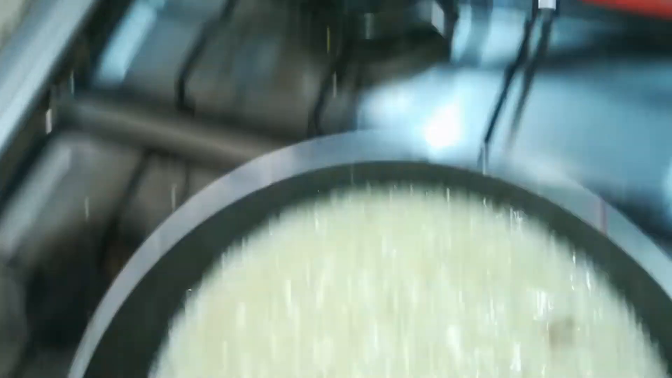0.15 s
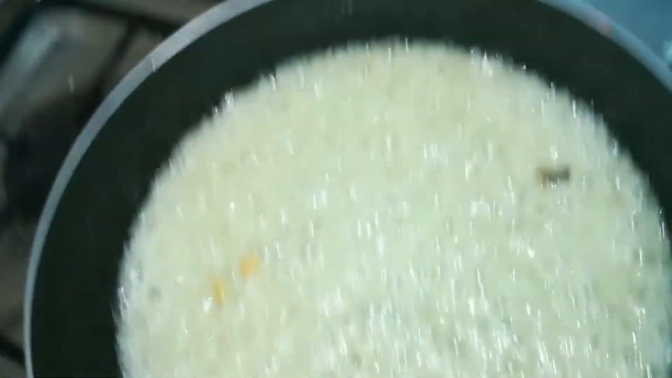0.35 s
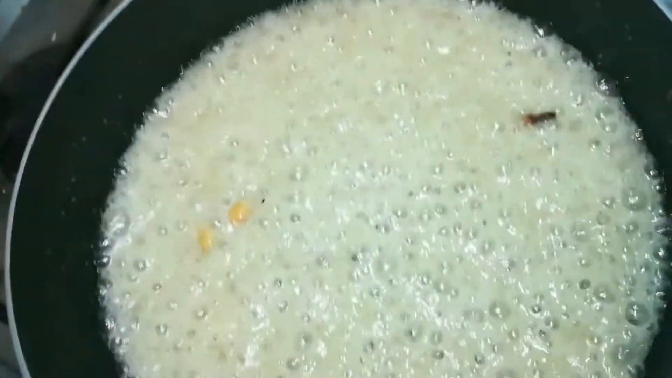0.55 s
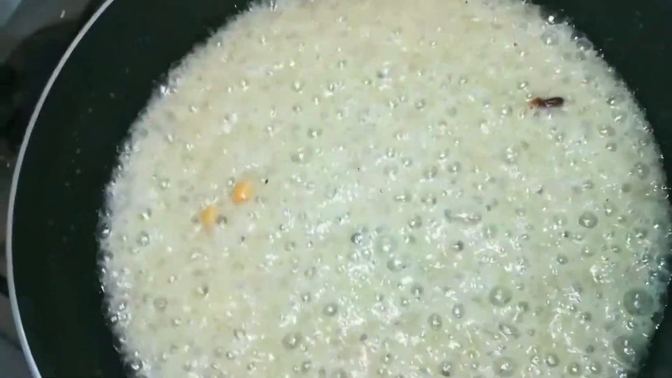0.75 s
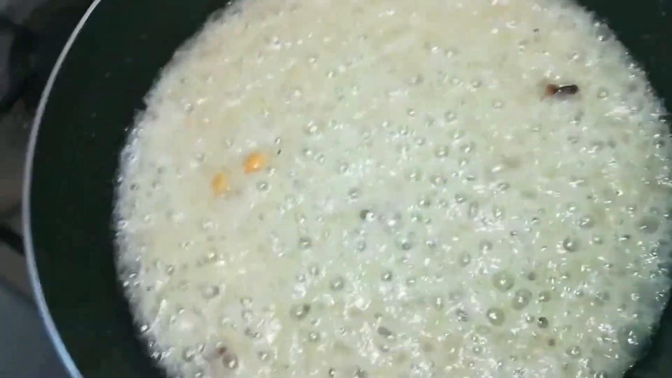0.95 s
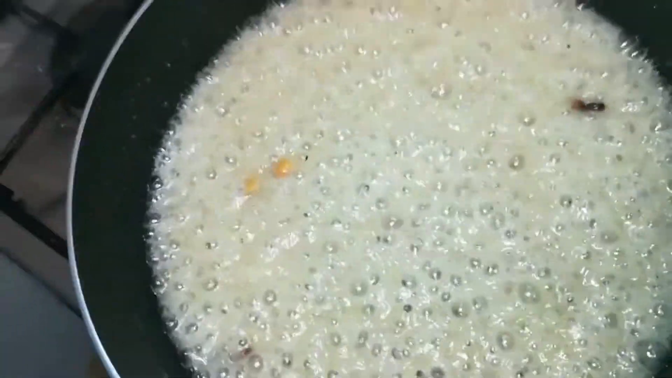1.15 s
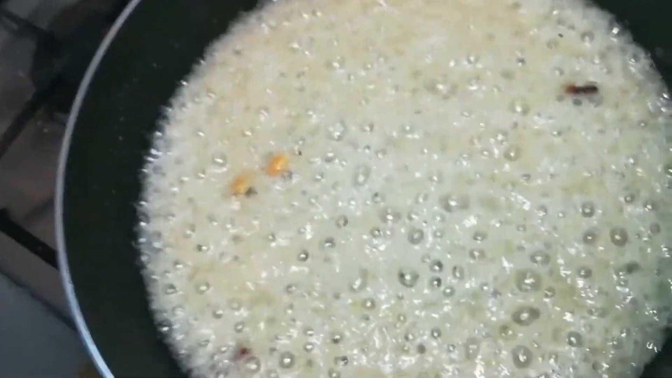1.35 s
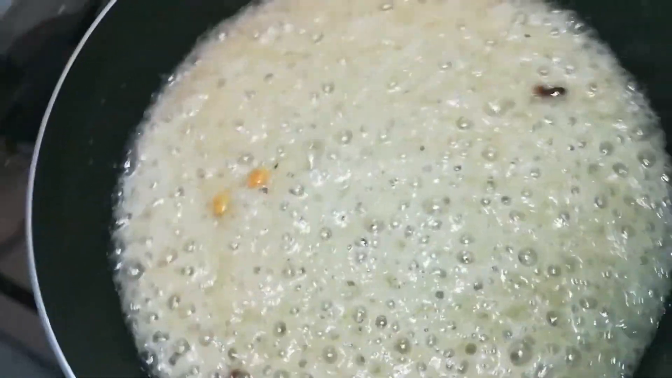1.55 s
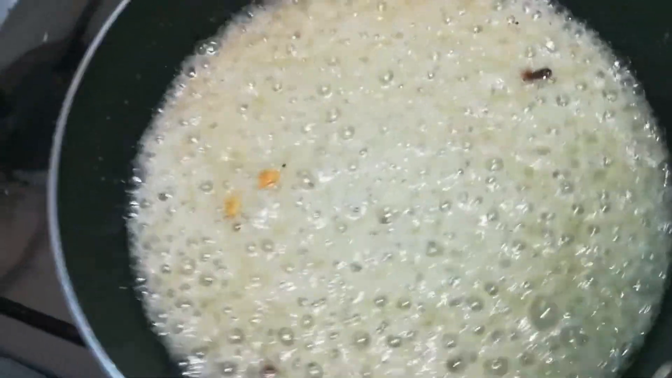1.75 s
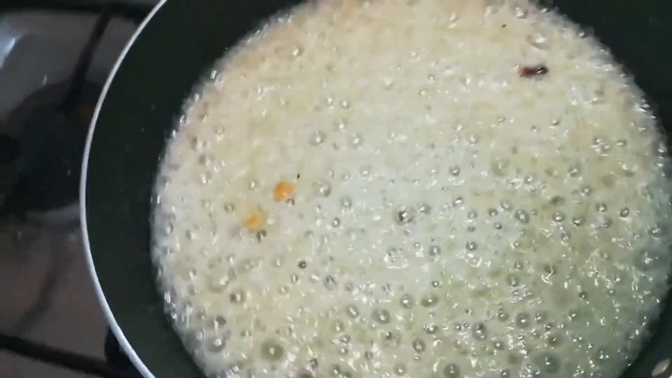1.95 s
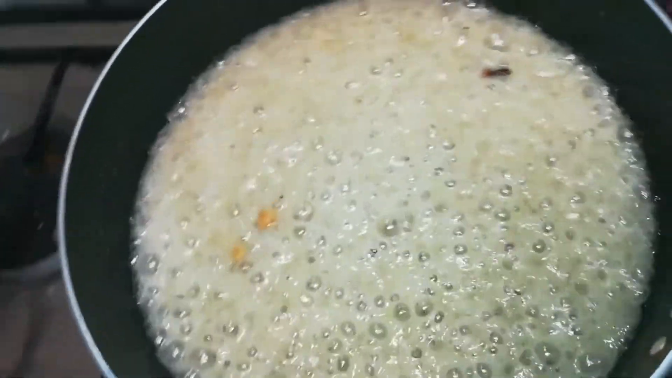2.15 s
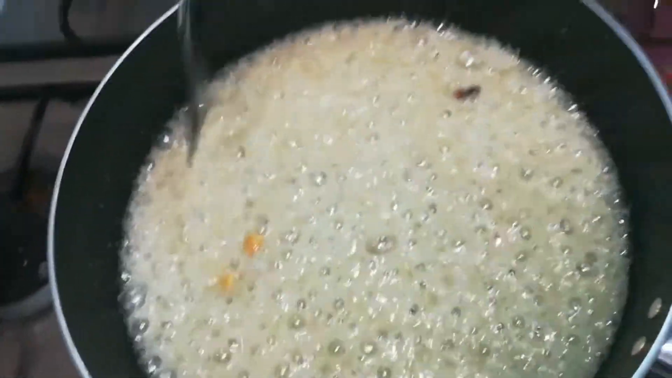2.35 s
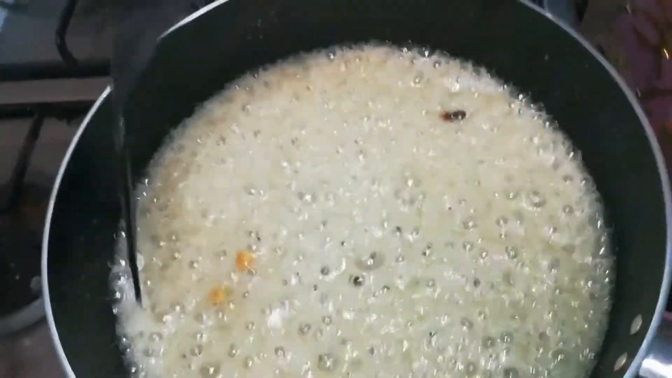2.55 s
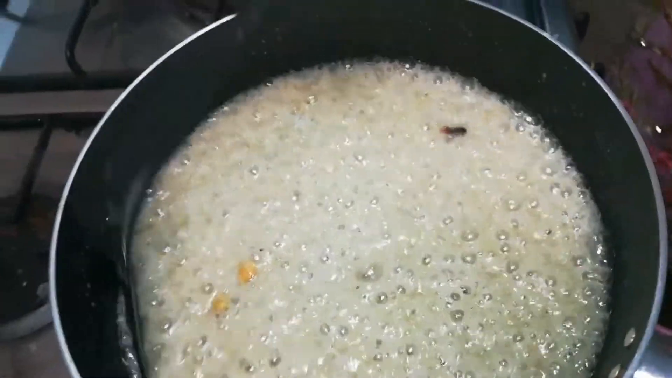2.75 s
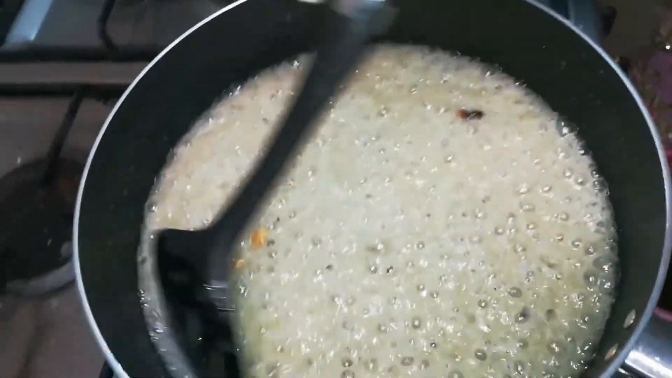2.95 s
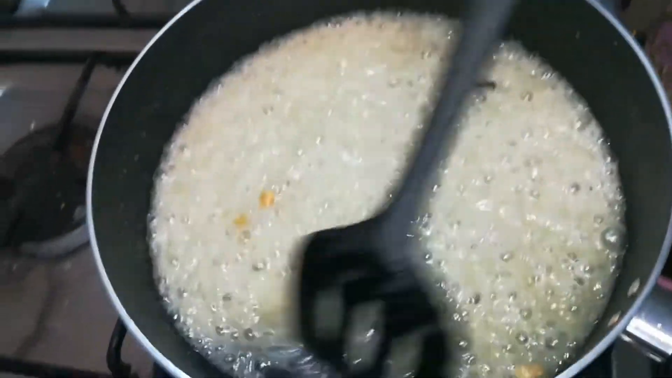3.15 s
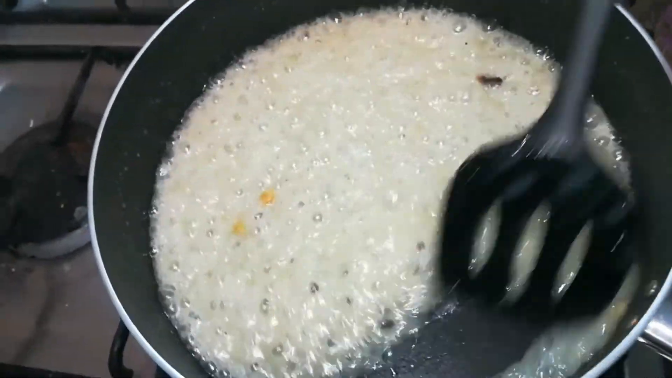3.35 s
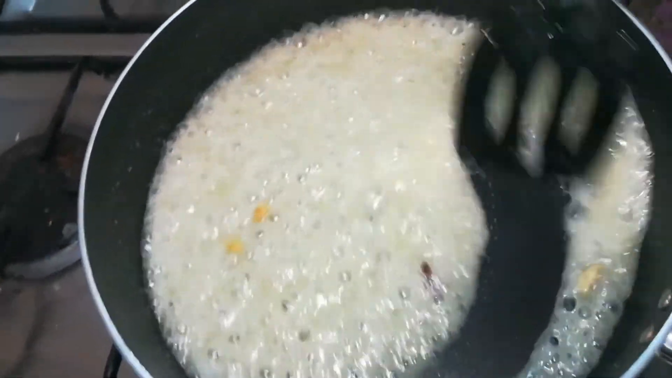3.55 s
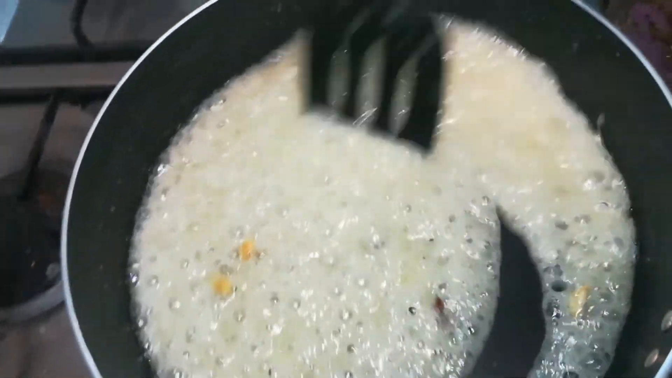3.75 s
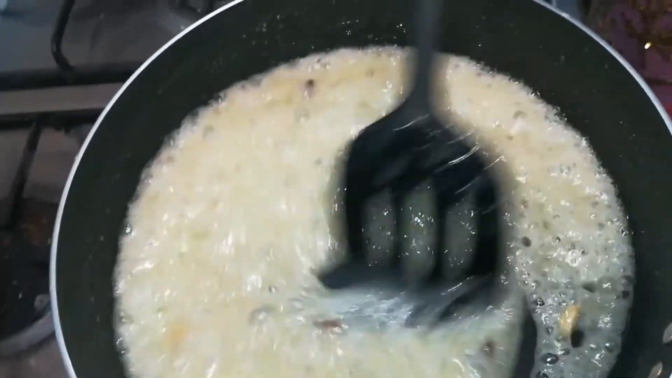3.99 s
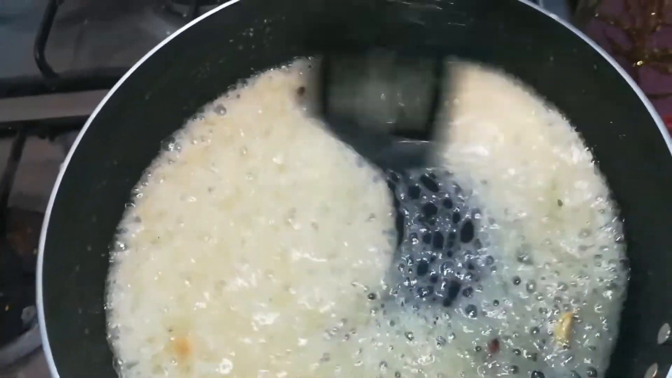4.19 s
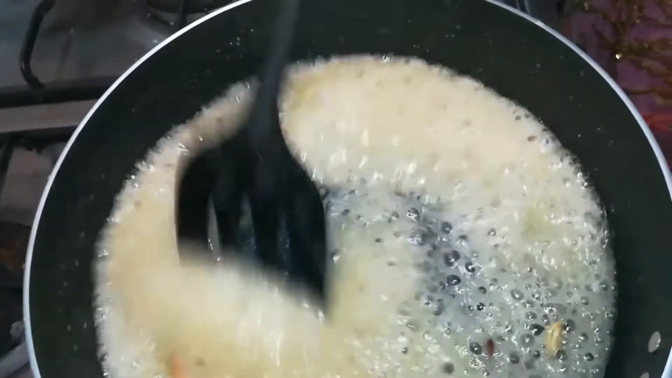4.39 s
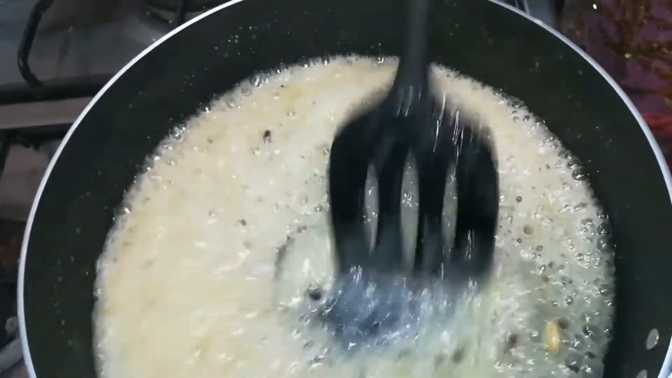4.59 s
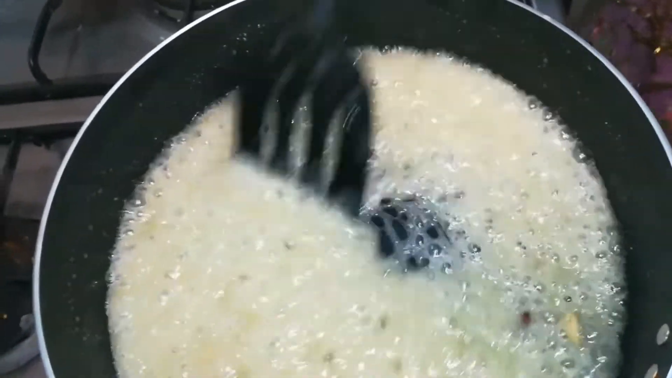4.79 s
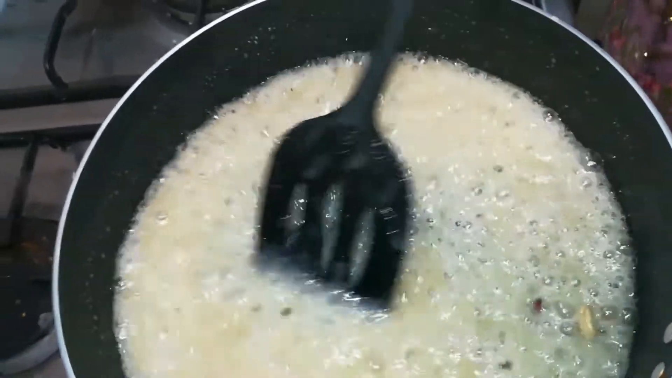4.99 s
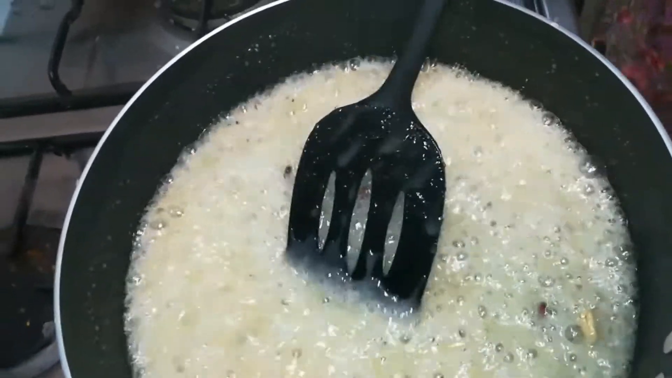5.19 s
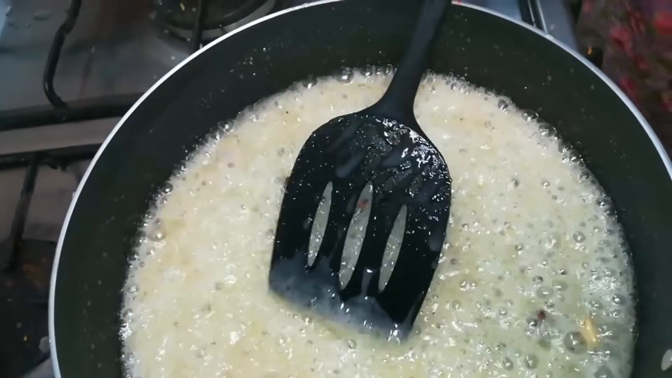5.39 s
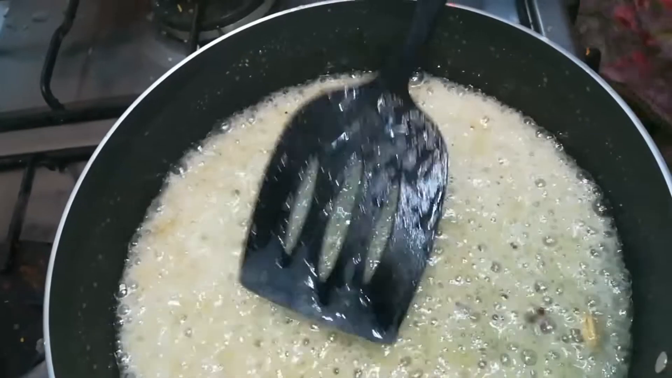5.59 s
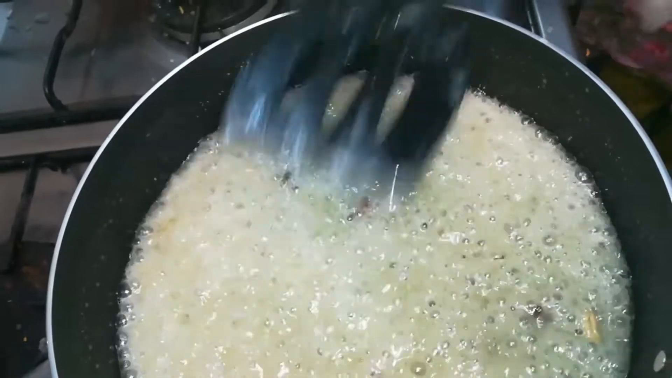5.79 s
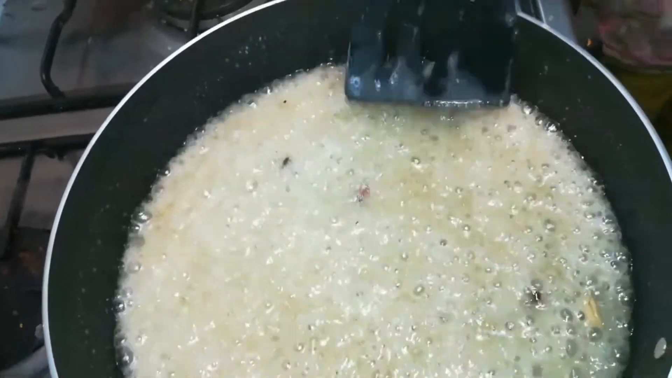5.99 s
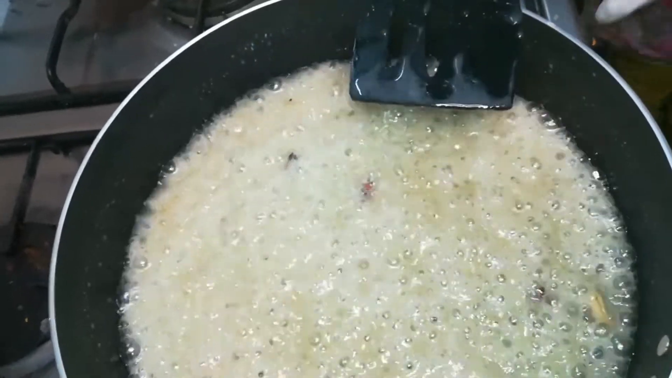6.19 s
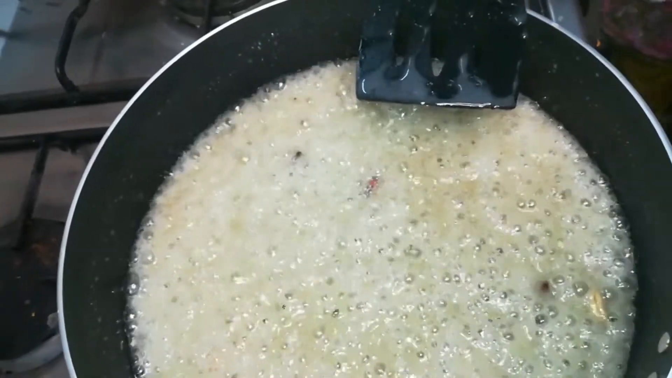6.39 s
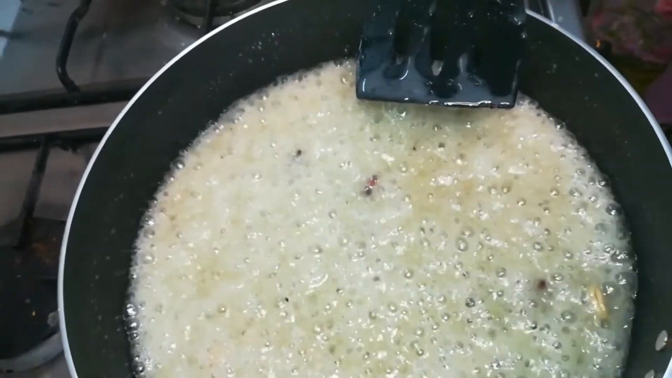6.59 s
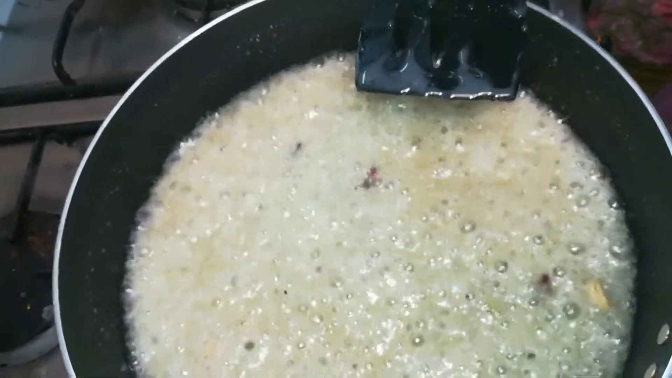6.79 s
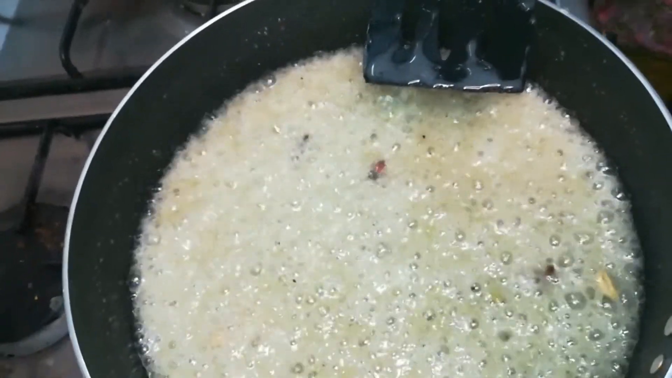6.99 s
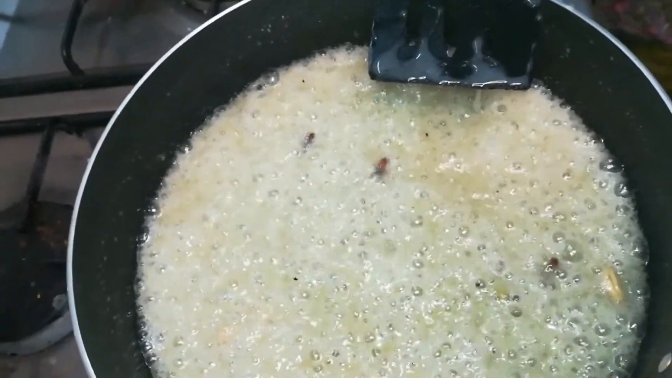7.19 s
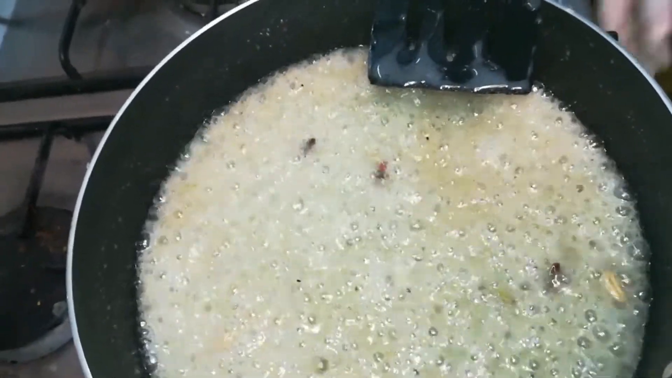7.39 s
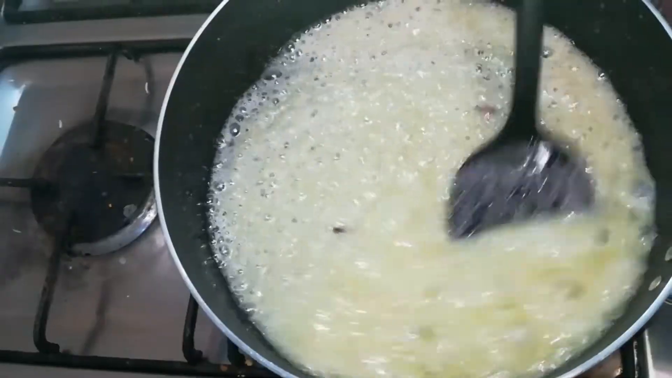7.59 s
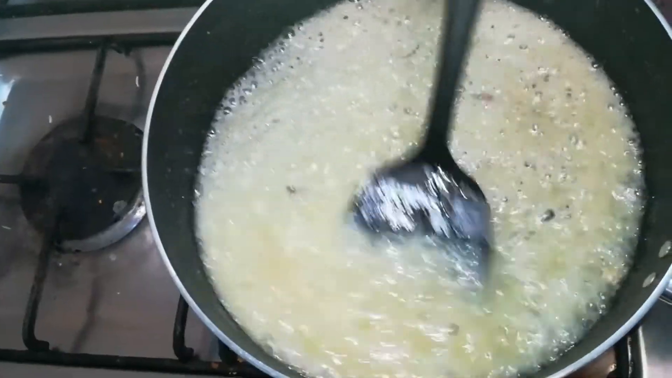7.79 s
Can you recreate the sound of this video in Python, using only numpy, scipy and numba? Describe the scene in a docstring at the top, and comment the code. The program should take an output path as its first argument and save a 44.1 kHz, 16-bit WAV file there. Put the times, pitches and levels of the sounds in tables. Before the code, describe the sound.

Close in a hard-walled kitchen, thick syrup boils in a pan on a gas stove: dense, bright ticking bubbles, fine fizz and a hollow burner rush. Faint bumps and hand rumble come from the handheld phone. Stirring brings a noisier sizzle and low gurgles. Then the spatula scrapes and strikes the pan with one very loud metallic crack and smaller follow-up knocks, before softer boiling ends abruptly.

```python
"""Thick sugar syrup boils in a pan on a gas stove, close to a hand-held phone in a hard-walled kitchen.
From the start, flurries of tiny ringing bubbles and a spitting rim sound over the burner's hollow resonant noise,
with hand rumble, spatula clacks and modal bumps; single bubbles snap out. Stirring bares hot metal: noisy sizzle
and low bubbles. Then a blade scrapes, hard blows ring pan and stove, and the boil calms; sound stops before the end."""
import sys
import numpy as np
from scipy import signal
from scipy.fft import rfft, irfft, next_fast_len
from scipy.io import wavfile
from scipy.ndimage import uniform_filter1d
from numba import njit

SR = 44100
rng = np.random.default_rng(int(sys.argv[2]) if len(sys.argv) > 2 else 0)


def wav_record(signal):
    """Record a signal, one row per channel, as 16-bit PCM in the file named by sys.argv[1]."""
    frames = np.transpose(np.atleast_2d(signal))
    bounded = np.clip(frames, -1, 1)
    # unit amplitude maps onto the largest positive 16-bit level
    quanta = np.round(bounded * 32767).astype(np.int16)
    wavfile.write(sys.argv[1], SR, quanta)


N = 345744
TIME = np.arange(N) / SR

# stove top and grate modes: pitch_hz, relative_db, t60_s
STOVE_MODES = [(66, -9.5, 0.54), (135.4, -7.5, 1), (144.3, 5, 0.3), (190.6, -4, 0.59), (218.4, -10, 0.63),
               (296, -1, .45), (320, -6.5, 0.42), (420, -12, 0.38)]
# spectrum of metal contact: frequency_hz, density_db
CONTACT_SPECTRUM = [(60, -23.5), (150, -5.5), (550, -8.5), (1400, -4.5), (2000, -8.5), (2600, -3),
                    (3600, -7), (6200, -2), (9000, -14), (15000, -23)]


def undb(db):
    """Decibels to gain."""
    return 10 ** (np.asarray(db) / 20)


def unit(x):
    """Scale to rms 1."""
    return x / np.sqrt(np.mean(x ** 2))


def curve(rows, axis=1):
    """One column of a table, joined by straight lines in time."""
    rows = np.asarray(rows, float)
    return np.interp(TIME, rows[:, 0], rows[:, axis])


def colour(x, points, power=1):
    """Filter by a (Hz, dB) spectrum; power scales its dB."""
    hz, db = np.transpose(points)
    size = next_fast_len(x.shape[-1])
    bins_hz = np.fft.rfftfreq(size, 1 / SR)
    gain = undb(power * np.interp(np.log(bins_hz + 1), np.log(hz), db))
    return irfft(rfft(x, size) * gain, size)[..., :x.shape[-1]]


def diffuse(size, alike_hz=430):
    """Noise from all around: long waves reach both ports alike, short ones do not."""
    mid, side = rfft(rng.standard_normal((2, size)))
    apart = 1 - 1 / (1 + (np.fft.rfftfreq(size, 1 / SR) / alike_hz) ** 4)
    mid, side = mid * np.sqrt(2 - apart), side * np.sqrt(apart)
    return unit(irfft(np.array([mid + side, mid - side]), size))


def walk(rate_hz):
    """Random levels, each held 1 / rate_hz s and slewed, at rms 1."""
    hold = max(int(SR / rate_hz), 2)
    steps = np.repeat(rng.standard_normal(N // hold + 1), hold)
    return unit(uniform_filter1d(steps, hold)[:N])


def fade(t, t60_s):
    """Free decay by 60 dB in t60_s."""
    return np.exp(-np.log(1000) * t / t60_s)


def add(out, start_s, sound):
    """Mix a sound in at start_s."""
    start = max(int(start_s * SR), 0)
    out[:, start:start + sound.shape[-1]] += sound[..., :N - start]


@njit
def resonate(x, hz, width_hz):
    """State-variable band-pass with a moving centre."""
    y, band, low = np.empty(len(x)), 0., 0.
    for i in range(len(x)):
        g, damping = np.tan(np.pi * hz[i] / SR), width_hz / hz[i]
        v = (band + g * (x[i] - low)) / (1 + g * (g + damping))
        band, low, y[i] = 2 * v - band, low + 2 * g * v, damping * v
    return y


@njit
def bubbles(times_s, hz, cycles, size):
    """Each bubble swells within a cycle and rings out over a few more."""
    y = np.zeros(N)
    for k in range(len(times_s)):
        first = int(times_s[k] * SR) + 1
        last = min(first + int(cycles[k] / hz[k] * SR), N)
        for i in range(max(first, 0), last):
            turn = (i / SR - times_s[k]) * hz[k]
            swell = 1 - np.exp(-2 * turn)
            decay = np.exp(-5 * turn / cycles[k])
            y[i] += size[k] * np.sin(2 * np.pi * turn) * decay * swell
    return y


def swarm(count, hz, octaves, cycles, spread_db, lag_s=0.000398, pan_db=3):
    """Bubbles all over the pan, each with its own size, pitch and path to the two ports."""
    when, rank, place = rng.random((count, 3)).T
    pitch, ringing, side = rng.standard_normal((count, 3)).T
    # the offset caps the size: bubbles burst before they grow very large
    size = undb(-spread_db * np.log(rank + .03))
    # bubbles close in time share a patch of foam and are alike in pitch
    patch = walk(22)[(when * N).astype(int)]
    pitch_hz = np.clip(hz * 2 ** (octaves * (pitch + .45 * patch)), 100, SR / 3)
    ring_cycles = cycles * np.exp(0.26 * ringing)
    ports = []
    for ear in (1, -1):
        times_s = when * N / SR + ear * lag_s * (place - .5)
        ports.append(bubbles(times_s, pitch_hz, ring_cycles, size * undb(ear * pan_db * side / 2)))
    return unit(np.array(ports))


def echoes(x, t60_s, wet_db):
    """Short reflections from the pan wall and the stove."""
    t = TIME[:SR // 4]
    tail = diffuse(len(t)) * fade(t, t60_s)
    tail /= np.sqrt(np.sum(tail ** 2) / 2)
    return unit(x + undb(wet_db) * signal.fftconvolve(x, tail, axes=1)[:, :N])


def ring(modes, t):
    """Decaying modes; the higher ones reach the two ports out of step."""
    out = 0
    for hz, db, t60_s in modes:
        skew_rad = np.array([[1], [-1]]) * rng.choice([-1, 1]) * min(hz / 800, np.pi / 4)
        out = out + undb(db) * fade(t, t60_s) * np.sin(2 * np.pi * hz * t + skew_rad)
    return out / np.sqrt(np.mean(out[:, :SR // 20] ** 2))


def boil_gain():
    """How hard the syrup boils: steady with a few flurries and lulls, then calmer as it cools."""
    # flurries and lulls of the foam: middle_s, change_db
    flurry_rows = [(.87, 2), (1.87, 4), (2.35, 3), (2.67, 1.5), (2.77, -4.5), (5.58, -1.5), (6.87, -2)]
    half_length_s = 0.089
    level_db = np.interp(TIME, [5.1, 7.4], [-49, -52])  # s, dB
    for middle_s, change_db in flurry_rows:
        level_db = level_db + change_db * np.exp(-((TIME - middle_s) / half_length_s) ** 2)
    return undb(level_db)


def boil():
    """Bursting foam: a dense patter of sharp ticks over a fine fizz of countless smaller ones."""
    # fizz spectrum: frequency_hz, density_db
    foam_spectrum = [(500, -35.5), (1000, -10), (2300, -8.5), (4000, 2.5), (5800, 3.5), (7200, -11.5),
                     (9000, -12.5), (12000, -14), (15500, -20)]
    surge_db, surges_per_s = .5, 11
    ticks = swarm(count=13000, hz=6200, octaves=.27, cycles=9, spread_db=4.6)
    ticks = colour(ticks, [(1500, -10), (4000, -2.5), (7000, -0.5), (10000, -5.5), (15000, -3.5)])
    flicker = undb(.8 * walk(35))
    ticks = echoes(ticks * flicker, t60_s=.06, wet_db=-9.5)
    fizz = swarm(count=40000, hz=5180, octaves=0.71, cycles=1.3, spread_db=3.0)
    fizz = unit(colour(fizz, foam_spectrum)) * flicker
    foam = undb(3.5) * ticks + undb(-1.0) * fizz
    return foam * boil_gain() * undb(surge_db * walk(surges_per_s))


def sizzle_gain():
    """Sizzling swells as the spatula bares the metal and dies as syrup flows back; the rim always spits."""
    # stirring spells that bare hot metal: start_s, end_s, sizzle_db
    stir_rows = [(3.1, 3.2, -49), (3.702, 4.622, -41.5), (7.448, 7.497, -55.5)]
    rise_db_per_s, fall_db_per_s = 26, 11
    rim_db = -7.5  # relative to the boil
    power = (boil_gain() * undb(rim_db)) ** 2
    for start_s, end_s, db in stir_rows:
        rise_db = rise_db_per_s * np.maximum(start_s - TIME, 0)
        fall_db = fall_db_per_s * np.maximum(TIME - end_s, 0)
        power = power + undb(db - rise_db - fall_db) ** 2
    return np.sqrt(power)


def stirring():
    """Hot metal at the rim and under the spatula spits; strokes fold larger, lower bubbles into the syrup."""
    # spitting spectrum: frequency_hz, density_db
    spit_spectrum = [(150, -17.5), (350, -12), (700, -21.5), (1500, -6.5), (2600, -3), (4000, -1.5),
                     (6500, 7.5), (9000, 3), (12000, 0), (15500, -2)]
    # strokes through the syrup: middle_s, length_s, level_db, bubble_pitch_hz
    stroke_rows = [(2.335, 0.098, -45.5, 1820), (3.545, 0.14, -53, 770), (3.927, 0.13, -46.5, 770),
                   (4.156, 0.12, -45, 740), (4.198, 0.034, -41.5, 830), (4.31, 0.4, -49, 1100),
                   (4.434, 0.057, -45.5, 734), (4.547, 0.084, -51, 910), (4.758, 0.19, -44.5, 857),
                   (4.936, 0.18, -53, 910)]
    spit = swarm(count=45000, hz=4150, octaves=1.443, cycles=1.55, spread_db=1.0)
    out = unit(colour(spit, spit_spectrum)) * sizzle_gain()
    for middle_s, length_s, db, hz in stroke_rows:
        slosh = swarm(count=6000, hz=hz, octaves=0.51, cycles=6, spread_db=-2.5)
        # the thick syrup smothers the largest bubbles
        slosh = unit(colour(slosh, [(hz / 2, -10), (hz, 0)]))
        out += slosh * undb(db) * np.exp(-2 * ((TIME - middle_s) / length_s) ** 2)
    return out


def burner():
    """The gas flame rushes under the pan and sounds a hollow, wandering resonance above a low drone."""
    # hollow resonance: time_s, pitch_hz, level_db
    burner_rows = [(0, 1220, -55), (.4, 1300, -58), (.65, 1298, -52.5), (1.1, 1270, -49.5),
                   (1.7, 1268, -53), (2.15, 1394, -53), (2.5, 1340, -53.5), (2.9, 1390, -55.5),
                   (3.4, 1250, -50), (3.65, 1256, -53.5), (5.2, 1316, -54.5), (5.5, 1290, -52.5),
                   (5.7, 1346, -57), (6.65, 1353, -53.5), (6.97, 1330, -56.5), (7.25, 1320, -52.5)]
    # rush spectrum: frequency_hz, density_db
    flame_spectrum = [(200, -25), (400, -17.5), (580, -11.5), (790, 2.5), (950, -2), (1300, 5.5),
                      (1700, -8.5), (2500, -19), (5000, -12.5), (15000, -33.5)]
    hz = curve(burner_rows) * (1 + .008 * walk(17.0))
    level_db = curve(burner_rows, axis=2)
    # two band-passes in series
    hollow = [resonate(resonate(x, hz, 120.0), hz, 580.0) for x in diffuse(N)]
    hollow = unit(np.array(hollow)) * undb(level_db + 2.5)
    # the rush follows the level half as far
    rush = unit(colour(diffuse(N), flame_spectrum)) * undb(-3 + (level_db + level_db.mean()) / 2)
    drone_spectrum = [(60, -23.0), (105, -3.5), (138, 5.0), (175, -15.5), (280, -14), (400, -28),
                      (900, -37.0)]
    drone = unit(colour(diffuse(N), drone_spectrum)) * undb(-65.5 + 1.5 * walk(1.7))
    return hollow + rush + drone


def handling():
    """The hand rumbles faintly through the phone, most while it swings towards the pan."""
    # rumble spectrum: frequency_hz, density_db
    rumble_spectrum = [(20, -0.5), (40, -1), (65, -0.5), (95, -10.5), (180, -16.5), (400, -31.5),
                       (900, -48.5)]
    swing_db, swing_end_s, swing_t60_s, held_db = -52.5, 0.31, 0.61, -59.5
    swing = undb(swing_db) * fade(np.maximum(TIME - swing_end_s, 0), swing_t60_s)
    rumble = unit(colour(diffuse(N), rumble_spectrum))
    return rumble * (swing + undb(held_db)) * undb(1.5 * walk(8.7))


def clacks():
    """The light spatula sounds one broad resonance: noise with a decay and a fainter, slower tail."""
    # clacks of the spatula: start_s, level_db, pitch_hz, t60_s
    clack_rows = [(.005, -47.5, 2250, 0.45), (0.2479, -35.5, 2940, 0.21), (.258, -48, 1500, 0.75),
                  (5.1759, -38.5, 2580, 0.057), (5.176, -42.5, 690, 0.14), (5.9266, -4.5, 2600, 0.034),
                  (6.067, -25, 5100, 0.11), (7.365, -54.5, 2000, 0.8)]
    out, t = np.zeros((2, N)), TIME[:SR]
    for start_s, db, hz, t60_s in clack_rows:
        spectrum = [(hz / 10, -16), (hz / 2, -11), (0.65 * hz, -3), (hz, 0),
                    (1.2 * hz, -4), (1.3 * hz, -14), (5 * hz, -32)]
        body = unit(colour(diffuse(SR), spectrum))
        decay = fade(t, t60_s) + undb(-12.0) * fade(t, 4 * t60_s)
        add(out, start_s, undb(db) * body * decay)
    return out


def bumps():
    """Dull bumps ring the stove's modes nearest their pitch and boom briefly in the room."""
    # soft bumps on the stove: start_s, level_db, pitch_hz, t60_s
    bump_rows = [(.01, -43, 215, 0.54), (0.251, -40, 143, 0.72), (.255, -40.5, 253, .75),
                 (.989, -56.5, 420, 0.99), (1.15, -45.5, 287, 0.51), (1.222, -45, 237, 0.49),
                 (1.405, -47.5, 245, 0.33), (1.547, -37, 156, 0.41), (1.648, -38, 146, 0.68),
                 (2.94, -42.5, 294, 0.22), (2.983, -41.5, 292, 0.35), (3.373, -37.5, 380, 0.14),
                 (5.175, -38.5, 428, 0.26), (5.2, -37, 67, 0.41), (7.371, -37, 141, 0.4),
                 (7.426, -39.5, 68, .3)]
    focus_db_per_octave = 31.5  # modes weaken away from the bump's pitch
    attack_t60_s = 0.041
    out, t = np.zeros((2, N)), TIME[:SR]
    for start_s, db, hz, t60_s in bump_rows:
        boom = [resonate(x, np.full(SR, float(hz)), 0.26 * hz) for x in diffuse(SR)]
        boom = colour(unit(np.array(boom)), [(500, 2), (1500, -6), (6000, -45)]) * fade(t, t60_s)
        modes = []
        for mode_hz, mode_db, _ in STOVE_MODES:
            distance_octaves = abs(np.log2(mode_hz / hz))
            modes.append((mode_hz, mode_db - focus_db_per_octave * distance_octaves, t60_s))
        bump = undb(-7.5) * boom + undb(-10.0) * ring(modes, t)
        add(out, start_s, undb(db) * bump * (1 - fade(t, attack_t60_s)))
    return out


def pops():
    """Single larger bubbles snap above the rest, reaching the ports a fraction of a cycle apart."""
    # single loud bursts: start_s, strength_db, pitch_hz
    pop_rows = [(.8675, -22, 5680), (1.1867, -22.5, 5030), (1.5678, -24, 5760), (1.8472, -23, 5100),
                (2.3345, -23, 5830), (3.7389, -20, 5640), (4.0936, -18.5, 7300), (5.759, -23, 5300),
                (6.4168, -21.5, 5780), (6.5685, -21, 7250), (6.652, -23, 6100)]
    pan_db = 9  # left minus right
    start_s, db, hz = np.transpose(pop_rows)
    lag_s = (rng.random(len(start_s)) - .5) / hz / 2
    cycles = np.full(len(start_s), 12.)
    ports = [bubbles(start_s + ear * lag_s, hz, cycles, undb(db + ear * pan_db / 2)) for ear in (1, -1)]
    return np.array(ports)


def scrape():
    """The blade chatters along the pan wall with a thin squeak: noise of jumping level, part of it resonant."""
    # spatula sliding on the pan: time_s, level_db
    slide_rows = [(5.725, -75), (5.753, -42), (5.8, -47), (5.84, -52), (5.885, -42), (5.912, -32),
                  (5.926, -35), (5.935, -75)]
    slips = diffuse(N) * undb(2.4 * walk(400))
    squeak = unit(np.array([resonate(x, np.full(N, 5650.), 550.0) for x in slips]))
    rasp = unit(colour(slips, CONTACT_SPECTRUM))
    return (squeak + undb(-2.0) * rasp) * undb(curve(slide_rows) - 1.5)


def blows():
    """Each blow cracks, rings the pan, shakes the stove beneath it and dies away in the kitchen."""
    # blows on the pan: start_s, level_db, brightness_hz, thud_db
    blow_rows = [(5.926, -6.5, 15000, -27), (5.9698, -38, 5000, -42), (6.026, -16.5, 2200, -22.5),
                 (6.066, -14, 3300, -13.5)]
    # pan modes: pitch_hz, relative_db, t60_s
    pan_modes = [(404, -3, .45), (545, -4, .35), (640, -1, .3), (748, -6, .7), (1055, 1, .45),
                 (1088, -3, .3), (1767, -2, .55), (2330, -5, .35), (2394, 0, .35), (2474, -1, .3),
                 (2520, -2, .25), (2692, 0, .3), (3187, -6, .4), (3415, -7, .85), (3725, -5, .25),
                 (4109, -8, .35), (4371, -5, .35), (4805, -9, .72), (5087, -6, .3), (5855, -4, .3),
                 (6215, -9, .5)]
    # room spectrum: frequency_hz, density_db
    kitchen_spectrum = [(60, -12.5), (140, -1), (500, -0.5), (1000, 0), (1500, -8.5), (2500, -3.5),
                        (6000, -5), (9000, -16), (15000, -30.5)]
    boom_spectrum = [(40, -31.5), (90, -19.0), (135, -2.5), (300, -6), (700, -11.0), (2000, -15.5),
                     (8000, -54.0)]
    out, t = np.zeros((2, N)), TIME[:SR]
    for start_s, db, bright_hz, thud_db in blow_rows:
        crack = unit(colour(diffuse(SR), CONTACT_SPECTRUM)) * fade(t, 0.12)
        room = unit(colour(diffuse(SR), kitchen_spectrum)) * fade(t, 0.75) * (1 - fade(t, 0.038))
        clang = crack + undb(-11.5) * ring(pan_modes, t) + undb(-10.0) * room
        # a softer contact lasts longer and leaves out the treble
        clang = signal.sosfilt(signal.butter(2, bright_hz, fs=SR, output="sos"), clang)
        boom = unit(colour(diffuse(SR), boom_spectrum)) * fade(t, 0.52)
        thud = (ring(STOVE_MODES, t) + undb(-2) * boom) * (1 - fade(t, .02))
        add(out, start_s, undb(db) * clang + undb(thud_db - 4.5) * thud)
    # the small pan radiates hardly any deep bass
    return signal.sosfilt(signal.butter(2, 55, "high", fs=SR, output="sos"), out)


def gain_control(x):
    """Turn down a few dB once the level passes a threshold; the held level sinks slowly, so the cut lasts."""
    threshold_db, recovery_db_per_s, depth_db, attack_s = -24, 3, 4, .2
    power = uniform_filter1d(np.mean(x ** 2, axis=0), size=441)
    level_db = 10 * np.log10(power.clip(1e-12))
    recovery_db = recovery_db_per_s * TIME
    held_db = np.maximum.accumulate(level_db + recovery_db) - recovery_db
    cut_db = np.clip(held_db - threshold_db, 0, depth_db)
    step = 1 / (attack_s * SR)
    return x * undb(-signal.lfilter([step], [1, step - 1], cut_db))


def scene():
    """The pan lies off to one side of the ports; its blows fill the room more evenly."""
    # microphone ports facing different ways: frequency_hz, left_minus_right_db
    port_rows = [(200, 4), (380, -2), (550, 8.5), (760, 6.5), (1000, -3.5), (1350, -3.5), (2300, -7.5),
                 (3400, -5), (4400, 1), (6000, 6), (8000, 4.5), (15000, 9)]
    near = boil() + stirring() + burner() + clacks() + scrape()
    near = colour(near, port_rows, power=np.array([[.5], [-.5]]))
    knocks = colour(blows(), port_rows, power=0.11 * np.array([[1], [-1]]))
    return near + handling() + bumps() + pops() + knocks


def record(dry):
    """The phone's slow gain control lets the hardest blow clip; it stops early and cuts the top."""
    stop_s, stop_fade_s, top_hz = 7.503, 0.014, 15900
    running = np.clip((stop_s - TIME) / stop_fade_s + .5, 0, 1)
    top = signal.ellip(10, .2, 70, top_hz, fs=SR, output="sos")
    return signal.sosfilt(top, np.clip(gain_control(dry), -1, 1) * running)


dry = scene()
out = record(dry)
wav_record(out)
```